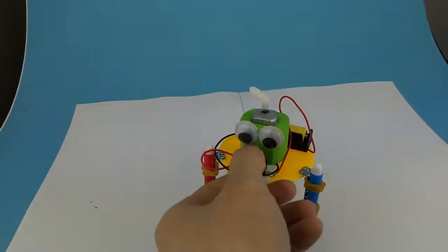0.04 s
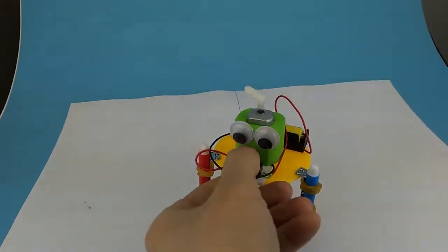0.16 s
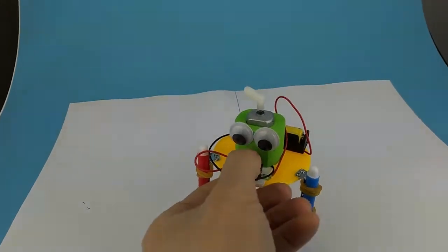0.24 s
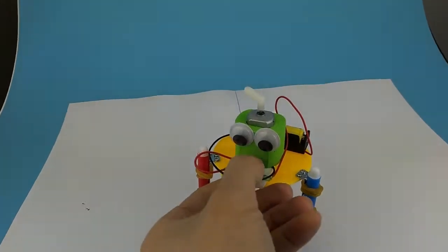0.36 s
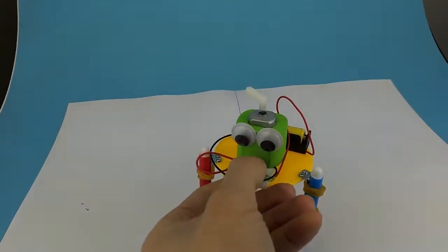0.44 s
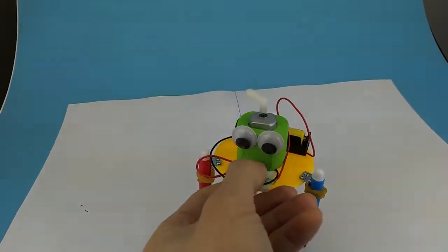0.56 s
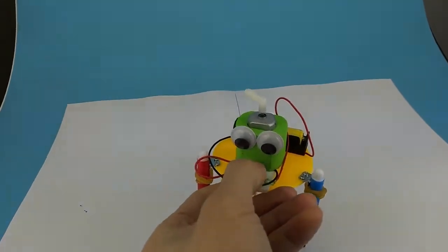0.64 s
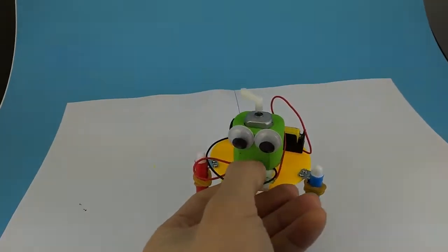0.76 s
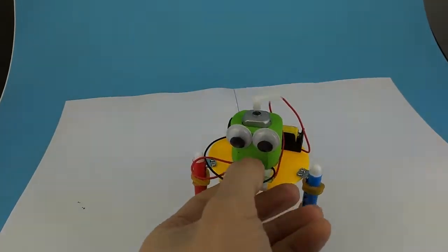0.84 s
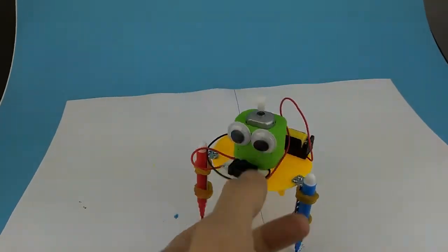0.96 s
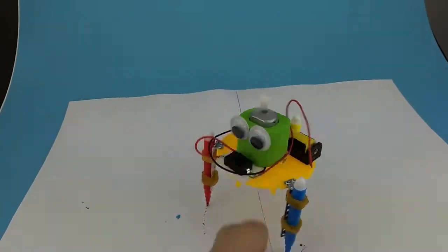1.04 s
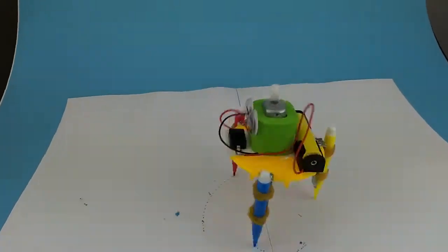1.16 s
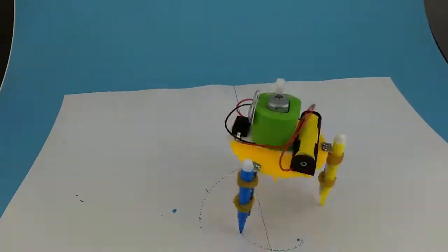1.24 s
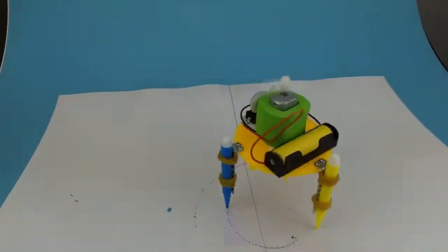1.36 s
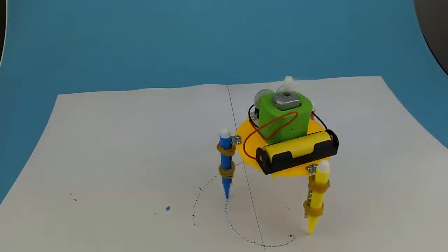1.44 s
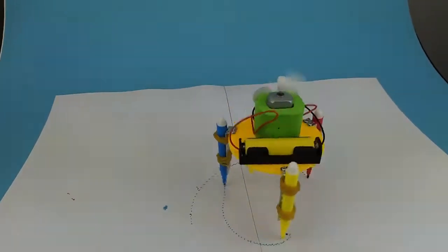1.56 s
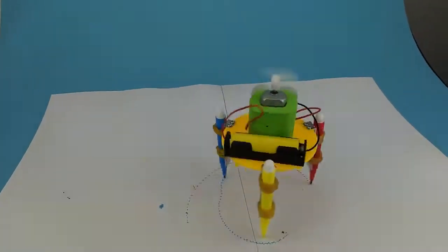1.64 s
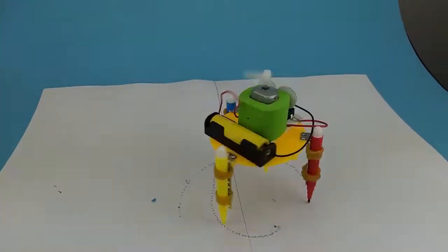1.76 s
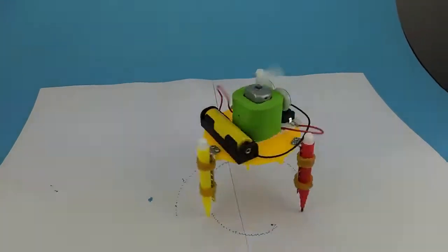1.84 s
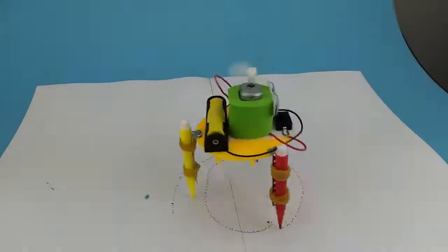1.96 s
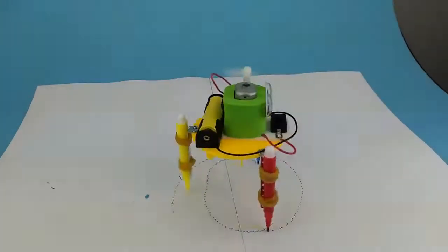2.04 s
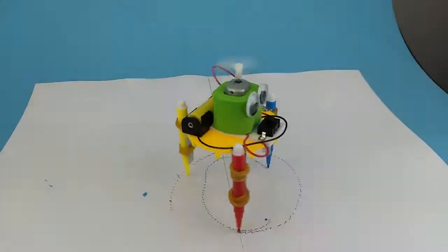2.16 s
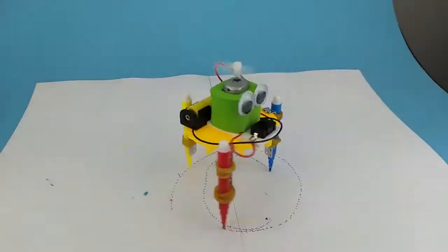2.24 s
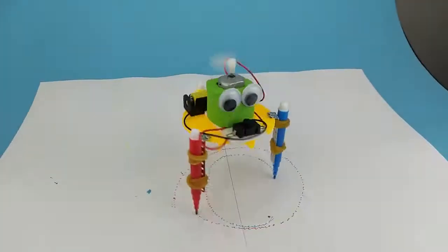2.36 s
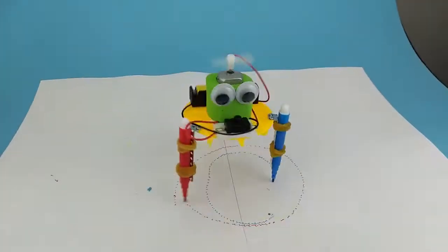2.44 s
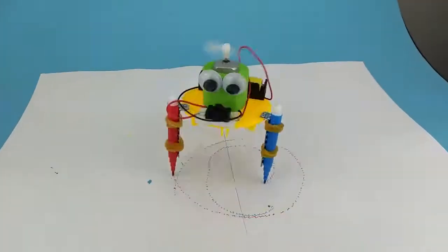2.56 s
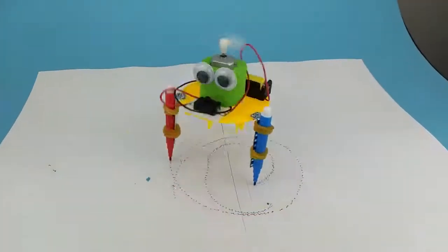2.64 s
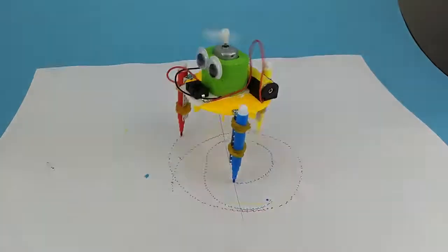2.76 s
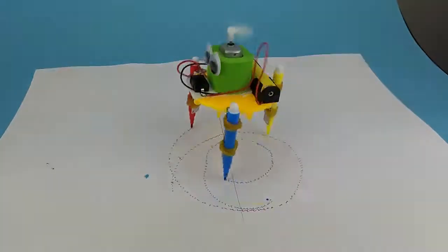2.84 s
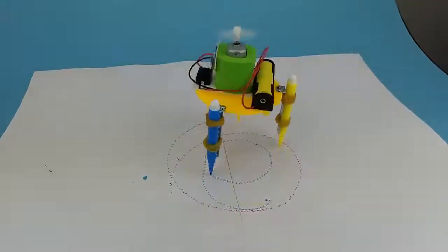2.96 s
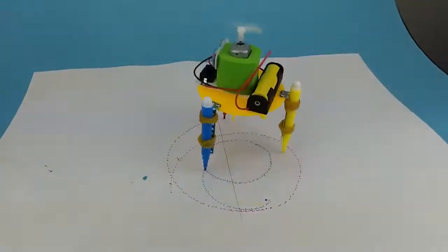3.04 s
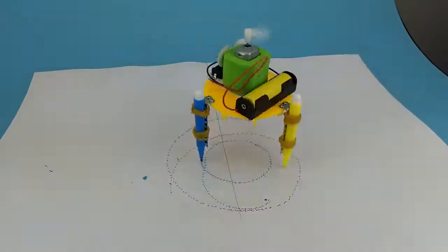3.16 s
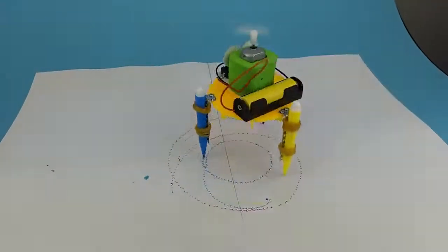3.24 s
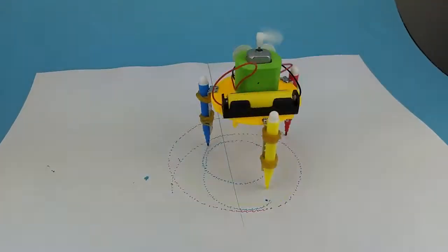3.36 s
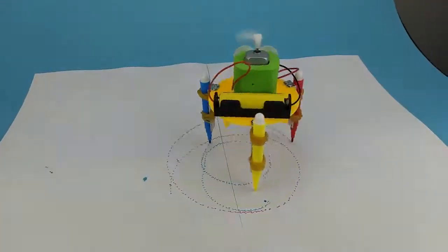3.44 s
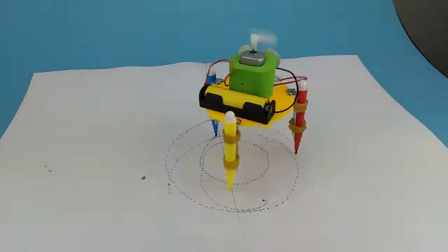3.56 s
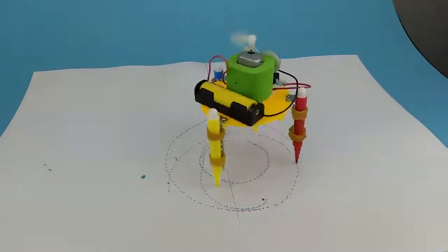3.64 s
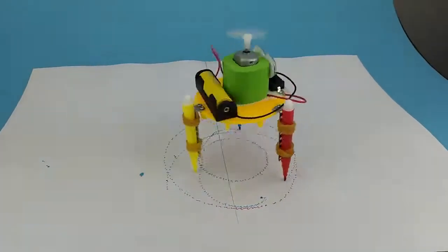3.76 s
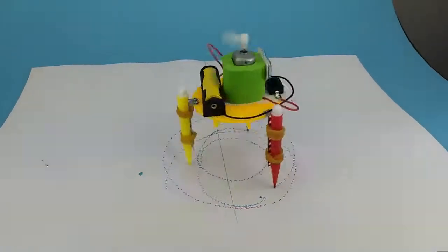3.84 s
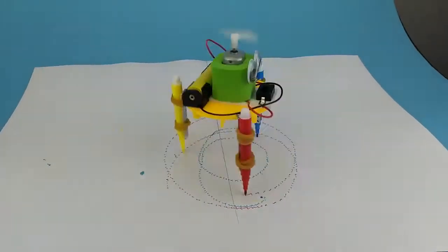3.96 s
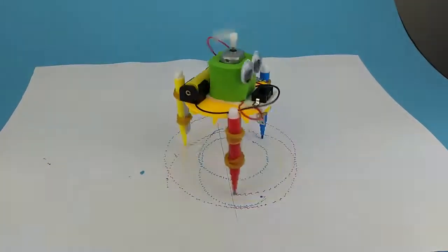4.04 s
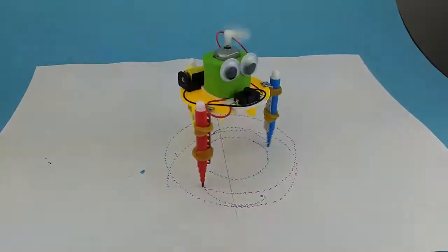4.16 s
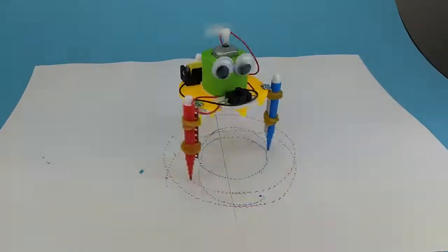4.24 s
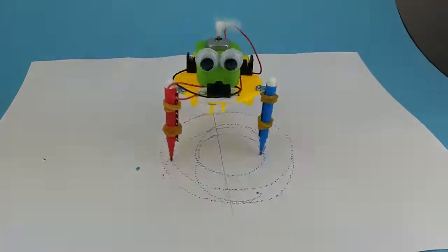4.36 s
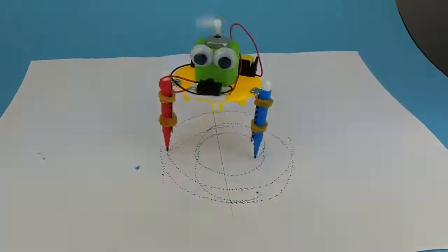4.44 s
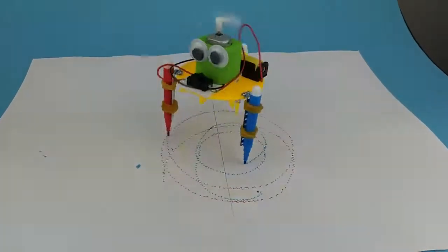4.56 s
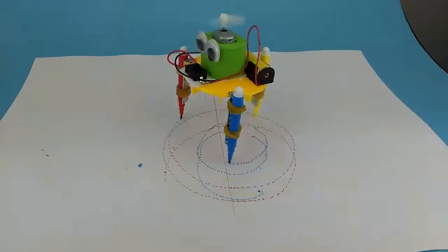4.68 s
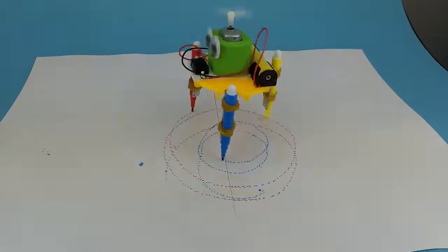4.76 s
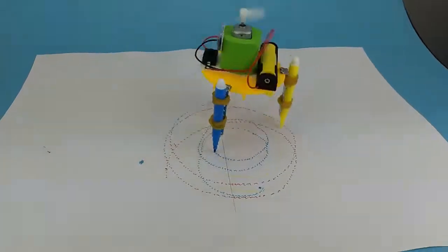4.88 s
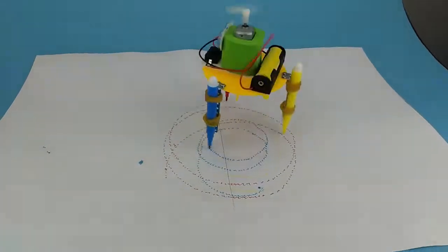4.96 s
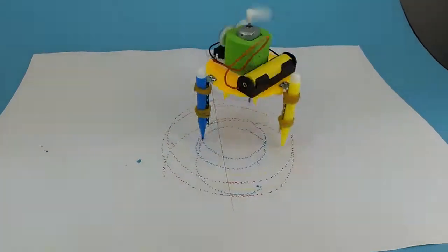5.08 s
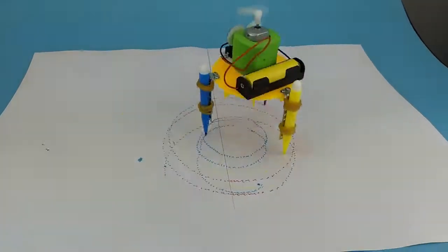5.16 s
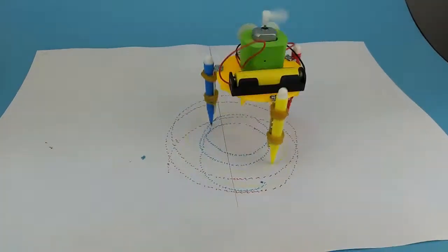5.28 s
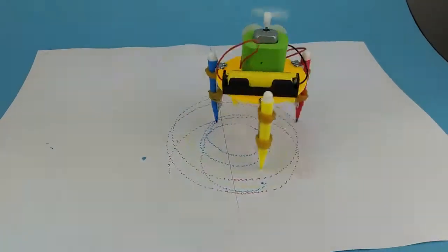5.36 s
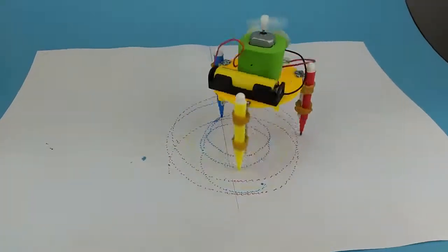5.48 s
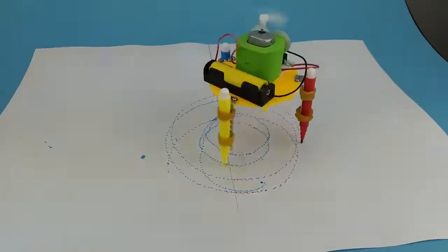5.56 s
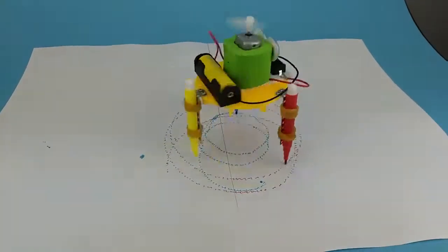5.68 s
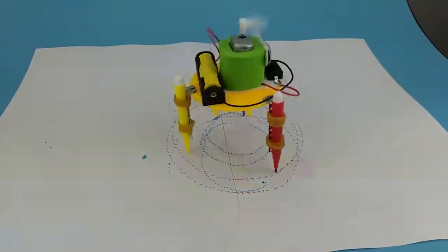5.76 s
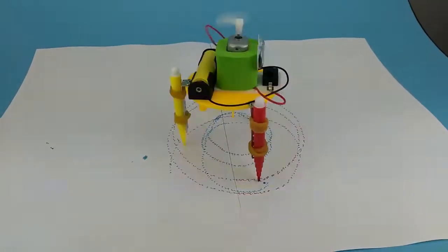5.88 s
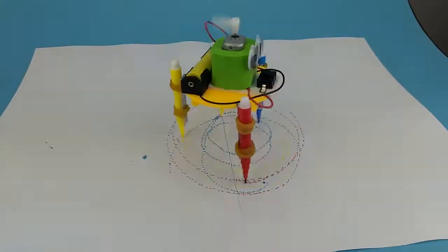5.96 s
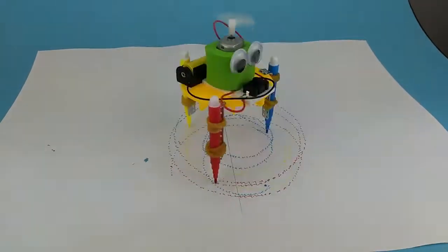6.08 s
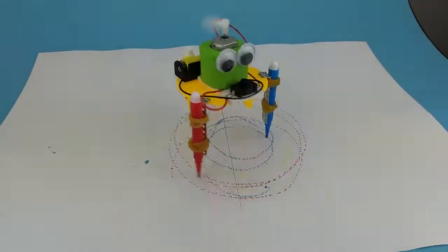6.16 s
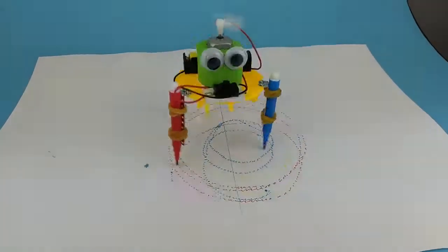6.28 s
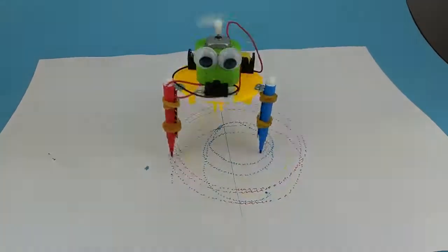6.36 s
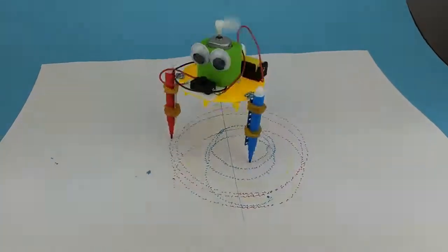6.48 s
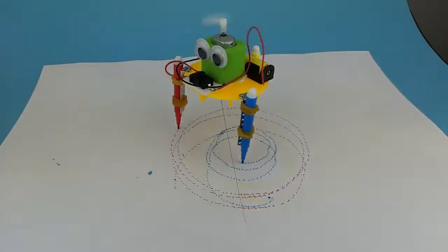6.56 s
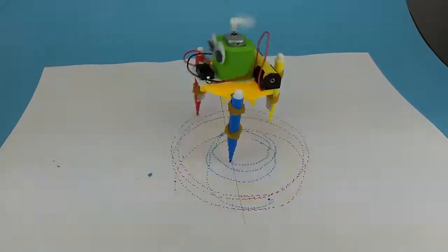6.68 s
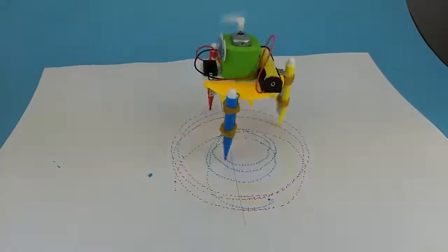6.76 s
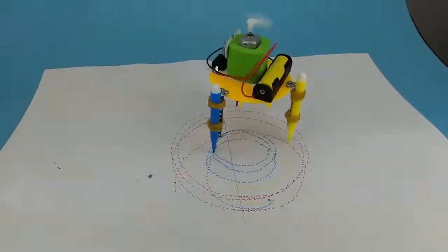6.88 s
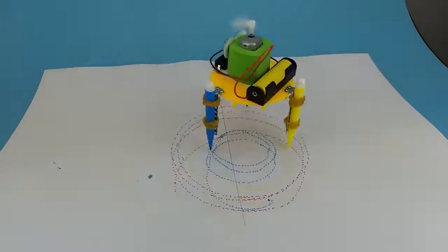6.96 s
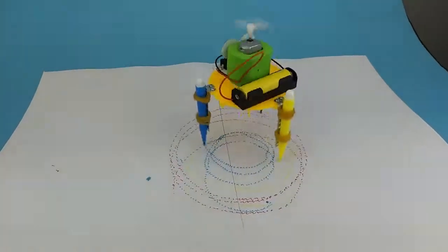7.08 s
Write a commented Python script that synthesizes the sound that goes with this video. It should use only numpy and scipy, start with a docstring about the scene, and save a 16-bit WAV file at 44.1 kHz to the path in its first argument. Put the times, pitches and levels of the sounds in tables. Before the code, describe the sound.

Fingers fumble a plastic toy, a switch snaps sharply, then a small off-balance motor buzzes and rattles its pen legs on a papered table.

```python
"""Fingers bump and rub a plastic drawing toy while a faint whistle wavers; a pen drags briefly on paper.
A switch clicks four times, then a small motor with an off-centre weight starts and shakes the toy.
It hops on felt pens: damped table modes drum, tips scratch the paper, loose pens and chassis rattle and clack.
Much later the hopping drops into a calmer gait. Reflections, a small room and a quiet hiss lie behind it all.
Noise and irregular impulses excite resonances and spectra; the result is the same in both channels."""
import sys
import numpy as np
from scipy import signal
from scipy.fft import rfft, irfft, next_fast_len
from scipy.io import wavfile
from scipy.ndimage import uniform_filter1d, map_coordinates

SR = 44100
rng = np.random.default_rng(int(sys.argv[2]) if len(sys.argv) > 2 else 0)


def generate_wav(signal):
    """Clip the signal to [-1, 1] and save it as 16-bit WAV at the path in sys.argv[1]."""
    frames = np.transpose(np.atleast_2d(signal))
    scaled = np.clip(frames, -1, 1) * 32767
    pcm = np.round(scaled).astype(np.int16)
    wavfile.write(sys.argv[1], SR, pcm)


N = 313992


def hopping_toy():
    """Forced vibration: the turning weight throws the toy about, drumming the table and jolting loose plastic."""
    press = throw()
    push = press * blows(contacts(rate=210, scatter=.6), spread_db=2.5)
    on_table = table_drum(push) + tip_knocks(push, press) + thuds()
    return on_table + loose_parts(press) + clacks() + paper_scratch(push)


MOTOR_HZ, MOTOR_WAVER_HZ = 69.662, 1.1463  # mean turning rate, size of its random waver
THROW_DB, ALTERNATE_DB = 2, -0.5  # sway of the landings each turn, and over every two turns


def throw():
    """Rotating unbalance: the weight presses down once a turn, harder on every second turn. Rms 1."""
    turn_hz = MOTOR_HZ + MOTOR_WAVER_HZ * wobble(rate=6)
    angle = 2 * np.pi * np.cumsum(turn_hz) / SR
    return unit(amp(THROW_DB * np.cos(angle) + ALTERNATE_DB * np.cos(angle / 2)))


# how hard the toy lands on the table, used as a swing about its mean: time_s, level_db
LANDING_SWING = [(0.92, -46.5), (1.15, -36.5), (1.27, -41), (1.42, -37.5), (1.6, -37.5), (1.74, -43),
                 (1.87, -40), (2.18, -52.5), (2.35, -51), (2.47, -46), (2.7, -43.5), (2.82, -47),
                 (3.25, -51.5), (3.74, -45.5), (3.95, -51), (4.28, -46.5), (4.41, -53), (4.5, -48.5),
                 (4.83, -52.5), (4.95, -48.5), (5.2, -51.5), (5.33, -45.5), (5.48, -49.5), (5.66, -49),
                 (5.8, -51), (6.08, -51.5), (6.22, -50.5), (6.68, -54.5), (7.12, -52)]
# how hard the legs shake in their holders, used as a swing about its mean: time_s, level_db
LEG_SWING = [(0.92, -38.5), (1.1, -36), (1.4, -39.5), (1.55, -40), (1.8, -47), (1.97, -37), (2.05, -44.5),
             (2.2, -45), (2.42, -37), (2.53, -39.5), (2.64, -35.5), (2.8, -44), (3.24, -46), (3.27, -38),
             (3.43, -37.5), (3.46, -46.5), (3.52, -40.5), (3.64, -46), (3.75, -41.5), (3.93, -42.5),
             (4.02, -48.5), (4.1, -37), (4.3, -37.5), (4.42, -38.5), (4.55, -40), (4.68, -41), (4.8, -37),
             (4.93, -43.5), (5.25, -40.5), (5.39, -40.5), (5.52, -40), (5.75, -42), (5.83, -43),
             (6.02, -39), (6.2, -43.5), (6.3, -41.5), (6.38, -44), (6.52, -41.5), (6.75, -45.5),
             (6.88, -46), (6.97, -44.5), (7.12, -44.5)]
START_S = 0.90221  # the motor starts
CALM_S, CALM_TAKES_S = 5.7818, .3  # middle and length of the change to the calmer gait
FLUTTER_PER_S = 14  # knots of the random flutter


def shaken(part):
    """Driven response: the gain of one part builds up with the motor and follows landings and legs."""
    level_db, build_s, landing_share, leg_share, settle_db_per_s, calm_drop_db, flutter_db = part
    t = np.arange(N) / SR
    running_s = np.maximum(t - START_S, 0)
    build_up = 1 - np.exp(-running_s / build_s)
    calm = np.clip(.5 + (t - CALM_S) / CALM_TAKES_S, 0, 1)
    hopping_db = landing_share * swing(LANDING_SWING) + leg_share * swing(LEG_SWING)
    hopping_db = hopping_db + flutter_db * wobble(FLUTTER_PER_S)
    return build_up * amp(level_db + hopping_db - settle_db_per_s * running_s - calm_drop_db * calm)


# resonances of the table; the first three are its slow modes: pitch_hz, width_hz, level_db (relative)
TABLE_MODES = [(71.392, 3.493, 0), (90.88, 13.367, -5), (105.19, 6.344, 8), (131.2, 9.94, 2),
               (155.77, 8.368, -1.5), (171.58, 7.169, 2.5), (194.04, 18.188, -1), (251.83, 7.276, -4.5),
               (338.26, 5.2, -12), (383.17, 2.8, -24.5), (519.69, 4.4, -11)]
# drive of slow and fast table modes, one row each: level_db, build_s, landing share, leg share,
# settling_db_per_s, calm_drop_db, flutter_db
SLOW_MODES_DRIVE = (-45.5, 0.3368, 0.4205, 0.0451, 0.1153, 2, 0.5)
FAST_MODES_DRIVE = (-42, 0.3037, 0.1555, 0.1203, 0.5995, -3.5, 1)


def table_drum(push):
    """Modal resonance: the landings excite slow and faster damped modes of the table."""
    slow_boom, fast_boom = booms()
    slow = np.hypot(shaken(SLOW_MODES_DRIVE), slow_boom)
    fast = np.hypot(shaken(FAST_MODES_DRIVE), fast_boom)
    # which modes answer depends on where the toy stands and how it hops
    slow_ring = steady(ringing(push, TABLE_MODES[:3]))
    fast_ring = steady(ringing(push, TABLE_MODES[3:]))
    return slow * slow_ring + fast * fast_ring


# booms when the hopping falls in step with the table: peak_s, level_db, share of the faster modes (0-1)
TABLE_BOOMS = [(.965, -40.5, 0.26), (1.14, -35, 0.96), (1.35, -37.5, 1), (1.44, -37, 0),
               (1.62, -38.5, 0.61), (1.91, -39, 0), (2.04, -46, 0.75), (2.36, -44.5, 0),
               (2.48, -45.5, 0.14), (2.64, -50, 0.34), (2.74, -48.5, 0.26), (2.93, -41.5, 0),
               (3.05, -46.5, 0.62), (3.28, -45.5, 0), (3.43, -38, 0), (3.66, -40.5, 0.89),
               (3.86, -46, 0.35), (4.2, -40.5, 0.37), (4.31, -41, 0.17), (4.53, -43, 0.53),
               (4.65, -43.5, 0.41), (5.15, -45.5, 0.14), (5.28, -43, 0.76), (5.39, -42, 0.58),
               (5.53, -39, 0.52), (5.86, -42.5, 0), (6.15, -42.5, 0.02), (6.29, -50, 0), (6.42, -54.5, .9),
               (6.68, -52, 0.02)]
BOOM_WIDTH_S = 0.06036


def booms():
    """Resonant build-up: gains of brief surges in the slow and the faster table modes."""
    peak_s, level_db, fast_share = np.transpose(TABLE_BOOMS)[..., None]
    t = np.arange(0, N, 64) / SR
    surges = amp(level_db) * np.exp(-((t - peak_s) / BOOM_WIDTH_S) ** 2)
    gains = []
    for share in (1 - fast_share, fast_share):
        coarse = (np.sqrt(share) * surges).sum(axis=0)
        gains.append(np.interp(np.arange(N) / SR, t, coarse))
    return gains


# spectrum of a soft landing: pitch_hz, density_db_per_hz
SOFT_KNOCK = [(120, -22), (260, 4), (350, 2.5), (430, -1.5), (600, -1), (780, -12), (1050, -9), (1500, -19),
              (2200, -16.5), (3500, -16), (9000, -48)]
# spectrum of a hard landing: pitch_hz, density_db_per_hz
HARD_KNOCK_SPECTRUM = [(300, -14), (550, -3.5), (800, -2), (1100, -5.5), (1600, -10.5), (2500, -11.5),
                       (5000, -35)]
# drive of the tips: level_db, build_s, landing share, leg share, settling_db_per_s, calm_drop_db, flutter_db
TIP_DRIVE = (-44, 0.2401, 1, 0, 0.4657, -0.2813, 1.5)
HARD_LANDING_DB = -32  # knocks this loud are fully hard


def tip_knocks(push, press):
    """Contact time: harder landings of the tips are shorter, so they sound brighter."""
    knock = shaken(TIP_DRIVE)
    taps = push + 2.029 * press * blows(contacts(rate=400, scatter=.8), spread_db=2)
    hard_taps = blows(contacts(rate=600, scatter=.7), spread_db=-0.5)
    hardness = np.minimum(knock / amp(HARD_LANDING_DB), 1)
    soft = unit(coloured(taps, SOFT_KNOCK)) / (1 + hardness)
    hard = amp(-3.5) * hardness * unit(coloured(hard_taps, HARD_KNOCK_SPECTRUM))
    return knock * (soft + press * hard)


# the heaviest landings: start_s, level_db
HEAVY_LANDINGS = [(1.1339, -37), (1.1658, -32), (1.1844, -29), (1.3791, -29.5), (1.393, -27), (1.9326, -29),
                  (2.7275, -33), (2.961, -36), (3.6227, -31.5), (3.6375, -37), (3.7109, -29), (3.741, -32),
                  (3.7691, -35), (4.2348, -33.5), (4.308, -31.5), (5.327, -34.5), (5.5952, -33),
                  (5.6251, -33.5), (5.6534, -30), (5.6834, -28.5), (5.865, -35.5), (6.19, -38),
                  (6.219, -34)]
# modes of each, before a random detune: pitch_hz, level_db (relative), life_s
HEAVY_MODES = [(178.5, -16.5, 0.0022), (357.2, -0.5, 0.001066), (503.95, -6, 0.001347),
               (991.9, -12.5, 0.00069)]


def thuds():
    """Impact response: a pen tip strikes the table, which answers with a dull, short-lived knock."""
    start_s, level_db = np.transpose(HEAVY_LANDINGS)
    detune = np.exp(0.066 * rng.standard_normal(len(start_s)))
    knock = 0
    for hz, mode_db, life_s in HEAVY_MODES:
        knock = knock + amp(mode_db) * click(hz * detune, life_s, size=SR // 50)
    return placed(np.round(start_s * SR).astype(int), -amp(level_db)[:, None] * knock)


# bending modes of the chassis and of the pens: pitch_hz, level_db (relative)
CHASSIS_MODES = [(3080, -1), (3480, 2.5), (4600, -1.5), (6400, -12)]
PEN_MODES = [(3880, -2), (4300, 0), (4900, -16.5), (6150, -3)]
# modes of a thinner, brighter chatter: pitch_hz, level_db (relative)
BRIGHT_MODES = [(5400, 5.5), (6400, 8), (7300, -16)]
# bursts of that chatter as the toy turns: peak_s, level_db
BRIGHT_SWELLS = [(1.1, -43), (1.3, -43), (2.05, -42.5), (2.63, -51.5), (4.14, -50), (4.77, -43.5),
                 (5.22, -49.5), (5.76, -48.5)]
# rasps of the lowest chassis modes in the first wild hops: peak_s, level_db
RASP_SWELLS = [(1.15, -45), (1.4, -40.5), (1.62, -45.5)]
# spells of the two lowest pen modes in the calm gait: peak_s, level_db
PEN_SWELLS = [(6.02, -42.5), (6.14, -49.5), (6.28, -41), (6.47, -45.5), (6.98, -51)]
BURST_WIDTH_S, RASP_WIDTH_S, SPELL_WIDTH_S = 0.10194, 0.09886, 0.0582
# small parts radiate weakly just below their lowest mode: pitch_hz, level_db
SMALL_PART_RADIATION = [(1200, 0), (2450, -2.5), (2900, 0)]
# drive of pens and chassis, one row each: level_db, build_s, landing share, leg share,
# settling_db_per_s, calm_drop_db, flutter_db
PEN_DRIVE = (-45, 0.3573, 0, 1.0222, -0.3274, -0.5, 1.2454)
CHASSIS_DRIVE = (-41, 0.2131, 0, .5, 1.5, 21, 0.6025)


def loose_parts(press):
    """Chaotic impacts: jolted pens and chassis tick and ring on their bending modes."""
    # pens and chassis are jolted together, so the taps stay separate
    jolts = contacts(rate=250, scatter=.45)
    pens = shaken(PEN_DRIVE) * rattle(jolts, PEN_MODES, spread_db=4.0, life_s=0.00034314)
    chassis = shaken(CHASSIS_DRIVE) * rattle(jolts, CHASSIS_MODES, spread_db=3.2, life_s=0.00052)
    bright = rattle(contacts(rate=260, scatter=.55), BRIGHT_MODES, spread_db=6.0, life_s=0.00033)
    bright = bright * swells(BRIGHT_SWELLS, BURST_WIDTH_S)
    rasp = rattle(contacts(rate=480, scatter=.55), CHASSIS_MODES[:2], spread_db=5.5, life_s=0.001026)
    rasp = rasp * swells(RASP_SWELLS, RASP_WIDTH_S)
    pen_ring = rattle(contacts(rate=290, scatter=0.45), PEN_MODES[:2], spread_db=9.5, life_s=0.00066)
    pen_ring = pen_ring * swells(PEN_SWELLS, SPELL_WIDTH_S)
    radiated = coloured(pens + pen_ring + chassis + rasp + bright, SMALL_PART_RADIATION)
    return np.sqrt(press) * flight() * radiated


def rattle(at, modes, spread_db, life_s):
    """Modal excitation: a part ticks at every jolt, each contact spot weighting its modes anew. Rms 1."""
    ticks = 0
    for hz, db in modes:
        detune, weight = rng.standard_normal((N // 40, 2))[:len(at)].T
        tick = click(hz * np.exp(0.06794 * detune), life_s)
        ticks = ticks + amp(db + 2 * weight)[:, None] * tick
    return unit(placed(at, blows(at, spread_db)[at, None] * ticks))


# the hardest clacks of the legs: start_s, level_db (relative), pitch_hz
LEG_CLACKS = [(1.176, -21.5, 3600), (1.3815, -22, 3900), (1.3854, -22, 4400), (1.4047, -21.5, 3800),
              (1.4083, -21.5, 4000), (1.4126, -21, 3800), (1.4693, -20.5, 3700), (1.5506, -22, 3900),
              (1.5614, -22, 4000), (1.9757, -20, 4000), (1.9915, -21, 5400), (2.0315, -18.5, 5400),
              (2.0624, -22, 5000), (2.0783, -21, 5400), (2.1056, -22, 4100), (2.1108, -19, 4000),
              (2.2732, -22, 4900), (2.3876, -22.5, 4200), (2.4083, -22, 4000), (2.4413, -21, 4900),
              (2.6123, -19, 4200), (2.6406, -18, 5100), (2.6674, -22, 4400), (2.6756, -22, 4000),
              (2.7694, -23, 4600), (3.1566, -23, 4600), (3.2274, -22, 4700), (3.2565, -21.5, 4200),
              (3.2634, -20, 4200), (3.2742, -21, 3900), (3.2812, -23, 4100), (3.3035, -22.5, 3900),
              (3.3233, -22.5, 4100), (3.347, -22, 3900), (3.3513, -21.5, 3800), (3.3585, -22, 3900),
              (3.3959, -23, 4200), (3.4003, -22.5, 4300), (3.411, -22.5, 4000), (3.425, -22.5, 4100),
              (3.5007, -22, 5300), (3.5206, -18, 4400), (3.6666, -22.5, 4400), (3.7378, -19, 3900),
              (3.8009, -22, 4700), (3.8591, -23, 4800), (3.8948, -22, 4100), (3.9315, -23, 4200),
              (3.9503, -21, 4200), (4.0747, -19, 4100), (4.0858, -19, 4900), (4.0914, -22.5, 3800),
              (4.164, -21, 4400), (4.184, -18.5, 3800), (4.1974, -21, 4300), (4.2015, -22.5, 4400),
              (4.2204, -21, 4800), (4.2671, -21, 4200), (4.2808, -22.5, 4200), (4.7136, -20.5, 5400),
              (4.812, -22, 4800), (4.963, -22, 4800), (4.9852, -23, 4400), (5.0357, -20.5, 4400),
              (5.1375, -21.5, 4600), (5.1542, -22, 4400), (5.2011, -23, 4000), (5.2073, -22, 4500),
              (5.3228, -21, 5100), (5.3691, -23, 4500), (5.3881, -21, 4200), (5.3942, -22, 4300),
              (5.4098, -23, 3900), (5.4187, -23, 4400), (5.4659, -18.5, 3500), (5.877, -22.5, 4200),
              (6.0384, -21, 4200), (6.1125, -23, 3900), (6.1485, -23.5, 4100), (6.1925, -24, 4500),
              (6.2325, -24, 4000), (6.2894, -23.5, 4000), (6.4503, -22, 4300), (6.5697, -25, 4500),
              (6.6947, -26, 4800), (6.7918, -25.5, 4360), (6.9632, -24, 4500)]
FLIGHT_S, FLIGHT_DB = .006, -4
CLACK_DB = -0.6  # trim of all clacks


def flight():
    """Free flight: without contact the legs rattle less, so the gain dips just before each hard clack."""
    gain = np.ones(N)
    for start_s, _, _ in LEG_CLACKS:
        gain[round((start_s - FLIGHT_S) * SR):round(start_s * SR)] = amp(FLIGHT_DB)
    return uniform_filter1d(gain, size=SR // 1000)


def clacks():
    """Impact of legs in their holders: a broad crack, its own pitch, and the ring of pens and chassis."""
    start_s, level_db, pitch_hz = np.transpose(LEG_CLACKS)
    pitched = .6 * click(pitch_hz, life_s=.00034)
    crack = .5 * click(pitch_hz, life_s=.00005)
    pen_ring = .22 * click(PEN_MODES[1][0], life_s=.0004) + .14 * click(PEN_MODES[3][0], life_s=.0003)
    chassis_ring = .16 * click(CHASSIS_MODES[1][0], life_s=.0005)
    clack = pitched + crack + pen_ring + chassis_ring
    return placed(np.round(start_s * SR).astype(int), amp(level_db + CLACK_DB)[:, None] * clack)


# spectrum of the scratching: pitch_hz, density_db_per_hz
SCRATCH_SPECTRUM = [(400, -6.5), (1000, -2), (1600, 1.5), (2200, 3.5), (2600, -1), (3300, 6), (4600, 7.5),
                    (5500, 5.5), (6400, 6), (7600, 1.5), (8500, 2.5), (9500, 2.5)]
# drive of the scratch: level_db, build_s, landing share, leg share, settling_db_per_s, calm_drop_db, flutter_db
SCRATCH_DRIVE = (-37.5, 0.0006, 0, 0.0304, 0.5924, 2.5, .5)


def paper_scratch(push):
    """Sliding friction: the tips skid over paper fibres, hardest as they land."""
    fibres = blows(contacts(rate=6000, scatter=.8), spread_db=0) * rng.standard_normal(N)
    skid = np.sqrt(np.abs(uniform_filter1d(push, size=SR // 300)))
    scratch = coloured(fibres * (1 + 0.5 * unit(skid)), SCRATCH_SPECTRUM)
    return shaken(SCRATCH_DRIVE) * unit(scratch)


# the switch clicks: start_s, level_db (peak), crack_db (broad crack over ring)
SWITCH_CLICKS = [(0.494, -37, 0), (0.6067, -7, 7), (0.846, -33, -19), (0.8706, -14.3, -8)]
# resonances of the switch case: pitch_hz, width_hz, level_db (relative)
CASE_MODES = [(3597, 355, -4), (4533, 242.5, 5.5), (5271, 680, -6.5), (6263.3, 359.2, -5.5)]
# spectrum of the crack: pitch_hz, density_db_per_hz
SNAP_SPECTRUM = [(400, -42), (750, -23), (1050, -12), (2340, -11), (3450, -1), (5020, 0), (6210, -2),
                 (6950, -14), (9300, -12), (11000, -36)]
CHATTER_DB, CHATTER_T60_S = -8, .035


def switch():
    """Snap-through: the spring cracks over, rings the small case and chatters briefly as it settles."""
    out, t = np.zeros(N), np.arange(SR // 20) / SR
    chatter = rng.standard_normal(len(t)) * amp(-60 * t / CHATTER_T60_S) * (1 - np.exp(-t / .002))
    kick = signal.unit_impulse(len(t)) + amp(CHATTER_DB) * chatter / np.linalg.norm(chatter)
    ring = unit(ringing(kick, CASE_MODES))
    crack = unit(coloured(kick, SNAP_SPECTRUM))
    for start_s, level_db, crack_db in SWITCH_CLICKS:
        snap = ring + amp(crack_db) * crack
        out[round(start_s * SR):][:len(snap)] += amp(level_db) * snap / np.abs(snap).max()
    return out


# the fingers shift their grip: peak_s, build_s, bump_db (dull bumping), rub_db (skin rubbing, before a trim)
GRIP_MOVES = [(0.023, 0.0961, -65.5, -45.5), (0.096, 0.0957, -52.5, -50), (.2, 0.05604, -59, -57.5),
              (.325, 0.12455, -64.5, -56), (0.397, 0.09868, -45.5, -53), (0.454, 0.00692, -51.5, -52.5),
              (.568, 0.0124, -60.5, -75), (0.649, 0.02794, -47, -49), (0.741, 0.02657, -59.5, -49.5),
              (.785, 0.02658, -49, -52.5), (0.873, 0.03966, -44.5, -45)]
# spectra of bumping, skin rubbing and the dragged pen: pitch_hz, density_db_per_hz
BUMP_SPECTRUM = [(29, -64.5), (50, -20), (156, -11.5), (193, -10), (372, -11), (546, -17.5), (696, -23),
                 (1500, -29.5), (1950, -60), (3300, -120)]
SKIN_SPECTRUM = [(350, -37), (600, -8), (716, -10.5), (874, -11), (2160, -10.5), (2410, -8), (2580, -8.5),
                 (4230, -8.5), (9210, -21.5), (10000, -23.5), (13000, -74), (22000, -120)]
PAPER_SPECTRUM = [(120, -67.5), (200, -23), (399, -23), (512, 4), (650, -12.5), (736, 4.5), (934, -4.5),
                  (1120, -1), (3000, -28.5), (3900, -32.5), (6600, -120)]
GRIP_RELEASE_S, LET_GO_S = 0.02546, 1
HOLD_BUMP_DB, HOLD_RUB_DB, RUB_TRIM_DB = -69, -67.5, -1.5  # resting fingers; trim of all rubbing
DRAG_DB, DRAG_FADE_DB_PER_S = -38, 264


def stick_slips(rate):
    """Stick-slip friction: irregular impulses of random sign, about rate a second."""
    return blows(contacts(rate, scatter=.6), spread_db=5.0) * np.sign(rng.standard_normal(N))


def hand():
    """Friction and contact: fingers bump and rub the plastic in moves, and drag a pen over the paper."""
    t = np.arange(N) / SR
    bump = amp(HOLD_BUMP_DB) * (t < LET_GO_S)
    rub = amp(HOLD_RUB_DB) * (t < LET_GO_S)
    for peak_s, build_s, bump_db, rub_db in GRIP_MOVES:
        width_s = np.where(t < peak_s, build_s, GRIP_RELEASE_S)
        move = np.exp(-np.minimum(((t - peak_s) / width_s) ** 2, 20))
        bump = np.hypot(bump, amp(bump_db) * move)
        rub = np.hypot(rub, amp(rub_db) * move)
    drag = amp(DRAG_DB - DRAG_FADE_DB_PER_S * np.minimum(t, 1))
    bumping = bump * unit(coloured(stick_slips(rate=900), BUMP_SPECTRUM))
    rubbing = amp(RUB_TRIM_DB) * rub * unit(coloured(stick_slips(rate=2700), SKIN_SPECTRUM))
    dragging = drag * unit(coloured(stick_slips(rate=1500), PAPER_SPECTRUM))
    return bumping + rubbing + dragging


# centre pitch of the thin whistle: time_s, pitch_hz
WHISTLE_PITCH = [(.05, 2340), (.33, 2330), (.45, 2300), (.58, 2318), (.8, 2325)]
# its swells, added to the steady level: peak_s, level_db
WHISTLE_BELLS = [(.07, -64.5), (.2, -71), (.315, -63), (.44, -70.5), (.485, -66.5), (.565, -59.5),
                 (.8, -70.5)]
WHISTLE_WAVER_HZ, WHISTLE_DB, WHISTLE_FLUTTER_DB, SWELL_WIDTH_S = 7.2, -74.5, 1, 0.02386


def whistle():
    """Frequency and amplitude modulation: a faint wavering tone swells and fades, gone at 1 s."""
    t = np.arange(N) / SR
    level = amp(WHISTLE_DB) + swells(WHISTLE_BELLS, SWELL_WIDTH_S)
    level = level * amp(WHISTLE_FLUTTER_DB * wobble(rate=29.24))
    hz = np.interp(t, *np.transpose(WHISTLE_PITCH)) + WHISTLE_WAVER_HZ * wobble(rate=32)
    tone = unit(np.sin(2 * np.pi * np.cumsum(hz) / SR))
    return level * np.clip((LET_GO_S - t) / 0.0772, 0, 1) * tone


def answer(x, t60s, delay_s):
    """Diffuse reflection: a fresh random diffuse echo for every fifth of a second of sound."""
    out, hop = np.zeros(N + SR), SR // 5
    for start in range(0, N, hop):
        echo = signal.fftconvolve(x[start:start + hop], tail(t60s))
        out[start + int(delay_s * SR):][:len(echo)] += echo
    return out[:N]


def tail(t60s):
    """Reverberant decay of energy 1: each frequency of a noise dies at its own speed."""
    hz, t, z = signal.stft(rng.standard_normal(SR // 3), SR, nperseg=256)
    x = signal.istft(z * amp(-60 * t / along(t60s, hz)[:, None]), SR, nperseg=256)[1]
    return x / np.linalg.norm(x)


def click(hz, life_s, size=SR // 200):
    """Damped oscillation: short ticks of one mode, one row per pitch."""
    t = np.arange(size) / SR
    u = t / life_s
    return u * np.exp(1 - u) * np.sin(2 * np.pi * np.reshape(hz, (-1, 1)) * t)


def contacts(rate, scatter):
    """Chaotic bouncing: sample indices of irregular contacts, about rate a second."""
    gaps = np.exp(scatter * rng.standard_normal(N // 4))
    at = (np.cumsum(gaps / gaps.mean()) * SR / rate).astype(int)
    return at[at < N]


def blows(at, spread_db):
    """Impulsive excitation: impulses of uneven size and steady power."""
    sizes = np.clip(rng.standard_normal(N // 4)[:len(at)], -2, 1.6)
    return steady(np.bincount(at, amp(spread_db * sizes), N))


def steady(x):
    """Level normalisation: divide by the running rms over 1/12 s, so separate curves set the loudness."""
    power = np.abs(uniform_filter1d(x ** 2, size=SR // 12))
    return x / np.sqrt(power + 1e-9 * np.mean(x ** 2))


def placed(at, rows):
    """Superposition: sum short sounds, each starting at its own sample."""
    samples = at[:, None] + np.arange(rows.shape[1])
    return np.bincount(samples.ravel(), rows.ravel(), N)[:N]


def swells(rows, width_s):
    """Amplitude envelope: the gain of brief bell-shaped swells at (peak_s, level_db)."""
    peak_s, level_db = np.transpose(rows)[..., None]
    t = np.arange(0, N, 64) / SR
    bells = amp(level_db) * np.exp(-((t - peak_s) / width_s) ** 2)
    return np.interp(np.arange(N) / SR, t, bells.sum(axis=0))


def swing(rows):
    """Level variation: a (time_s, level_db) curve as dB about its own mean."""
    db = np.interp(np.arange(N) / SR, *np.transpose(rows))
    return db - db.mean()


def wobble(rate):
    """Random modulation: a smooth curve with rate knots a second."""
    t = np.linspace(0, N / SR, 2048)
    curve = map_coordinates(rng.standard_normal(len(t)), [t * rate], mode="mirror")
    return np.interp(np.arange(N) / SR, t, curve)


def ringing(x, modes):
    """Modal sum: x through damped resonances of alternating sign."""
    def response(f):
        total = 0
        for k, (centre, width, db) in enumerate(modes):
            damping = 1j * f * width
            total = total + (-1) ** k * amp(db) * damping / (centre * centre - f * f + damping)
        return total
    return filtered(x, response)


def coloured(x, spectrum):
    """Minimum phase: give x a spectrum causally, so that attacks stay sharp."""
    def response(hz):
        cepstrum = irfft(np.log(amp(along(spectrum, hz))))
        return np.exp(rfft(2 * cepstrum[:len(cepstrum) // 2], len(cepstrum)) - cepstrum[0])
    return filtered(x, response)


def filtered(x, response):
    """Linear filtering: x times a complex response of frequency."""
    m = 2 * next_fast_len((len(x) + SR // 2) // 2)
    return irfft(rfft(x, m) * response(np.fft.rfftfreq(m, 1 / SR)), m)[:len(x)]


def along(points, hz):
    """Logarithmic pitch scale: (pitch_hz, value) points read on a log axis."""
    f, v = np.transpose(points)
    return np.interp(np.log(hz + 1), np.log(f + 1), v)


def amp(db):
    """Level to amplitude: decibels to gain."""
    return 10 ** (np.asarray(db) / 20)


def unit(x):
    """Root mean square: scale to rms 1."""
    return x / np.sqrt(np.mean(x ** 2) + 1e-20)


# reverberation of the small room: pitch_hz, t60_s
ROOM_DECAY = [(150, 0.44), (1000, 0.48), (4000, 0.22), (10000, 0.42)]
# spectrum of the quiet hiss: pitch_hz, density_db_per_hz
HISS_SPECTRUM = [(20, -8.5), (60, 1.5), (200, -1), (420, -13.5), (1500, -18), (4800, -15), (7500, -29.5),
                 (9500, -21)]


def scene():
    """Superposition: toy and hand, reflections from table and backdrop, the room and its quiet hiss."""
    toy = hopping_toy()
    fingers = hand() + switch()
    reflected = [(250, -22.5), (700, -4.0)]  # pitch_hz, level_db: small surfaces reflect little bass
    near_decay = [(1000, 0.033), (9000, 0.045)]  # pitch_hz, t60_s
    near = amp(-7.0) * answer(coloured(toy + fingers, reflected), near_decay, delay_s=.0025)
    # the hand covers the switch, so less of it reaches the room
    to_room = coloured(toy + amp(-10.5) * fingers, reflected)
    room = amp(-7.5) * answer(to_room, ROOM_DECAY, delay_s=.008)
    hiss = amp(-59.5) * unit(coloured(rng.standard_normal(N), HISS_SPECTRUM))
    return np.tile(toy + fingers + near + room + whistle() + hiss, (2, 1))


TOP_HZ = 9700


def record(dry):
    """Band limitation: a very steep low-pass leaves almost nothing above TOP_HZ."""
    def low_pass(hz):
        return 1 / np.sqrt(1 + (hz / TOP_HZ) ** 300)
    return np.array([filtered(x, low_pass) for x in dry])


dry = scene()
out = record(dry)
generate_wav(out)
```